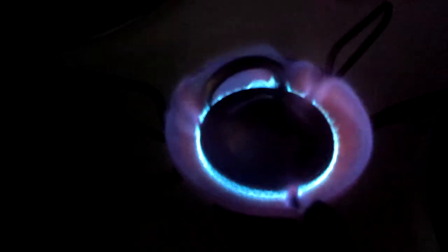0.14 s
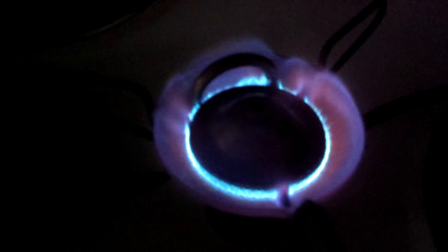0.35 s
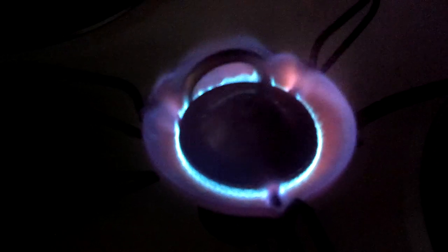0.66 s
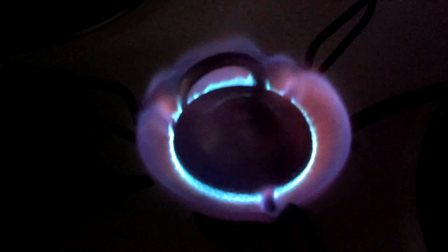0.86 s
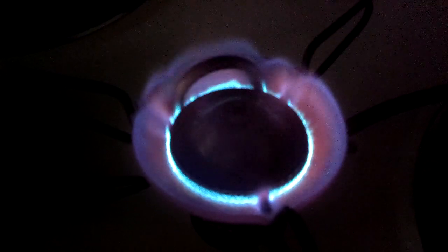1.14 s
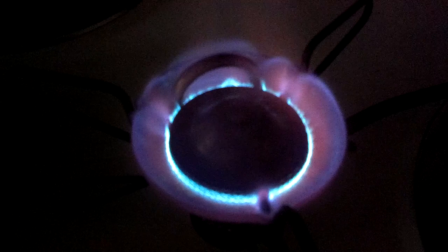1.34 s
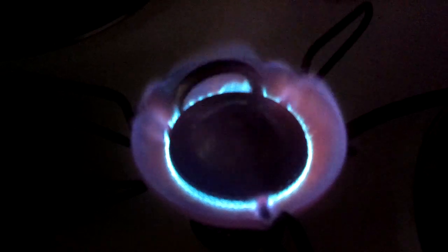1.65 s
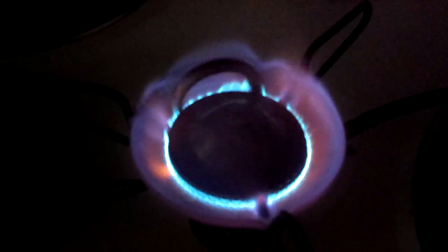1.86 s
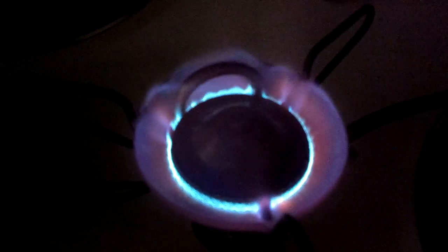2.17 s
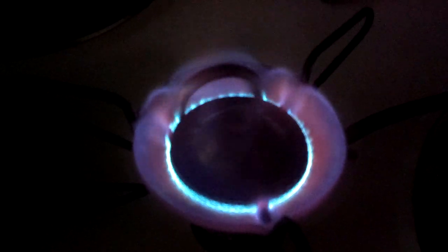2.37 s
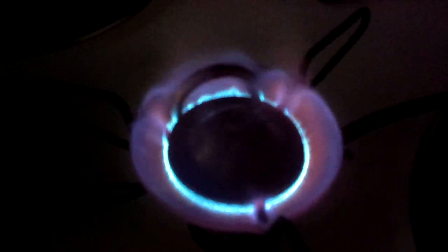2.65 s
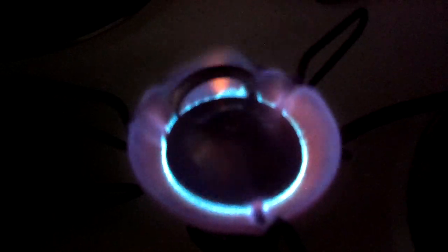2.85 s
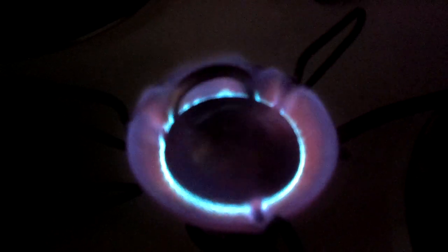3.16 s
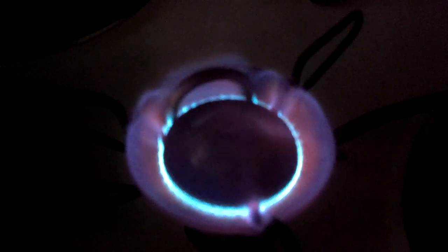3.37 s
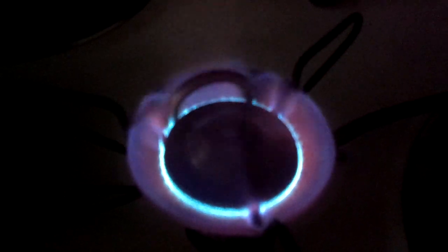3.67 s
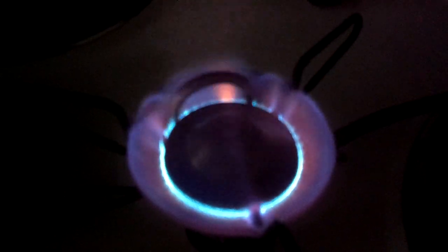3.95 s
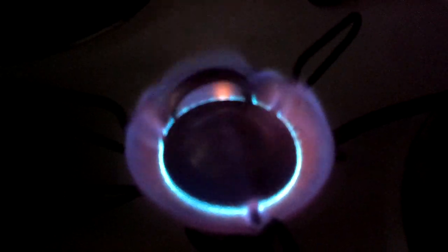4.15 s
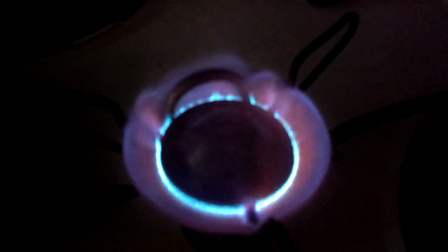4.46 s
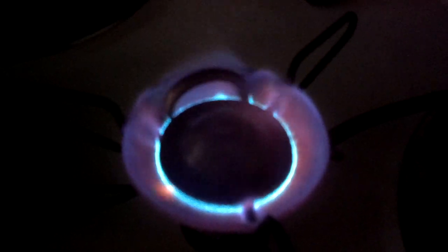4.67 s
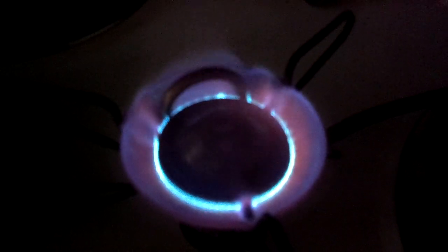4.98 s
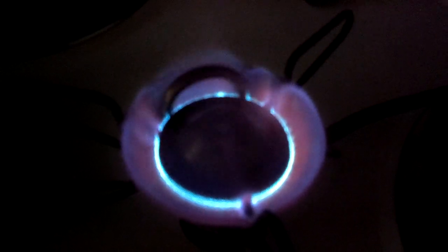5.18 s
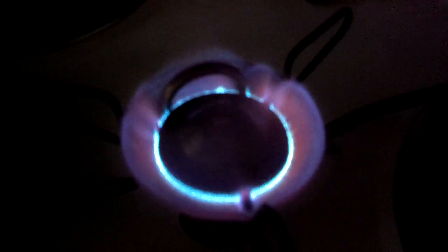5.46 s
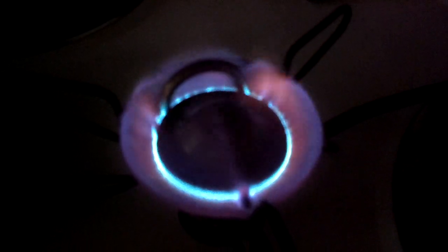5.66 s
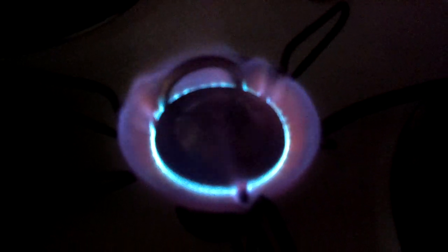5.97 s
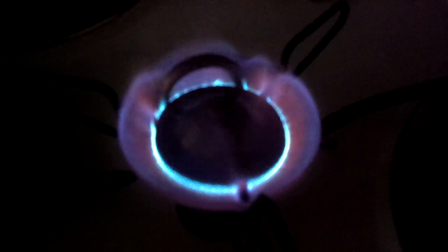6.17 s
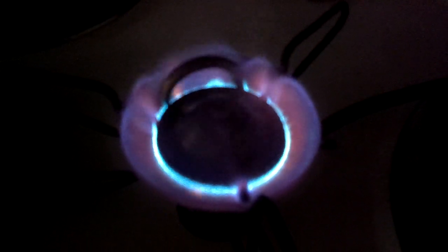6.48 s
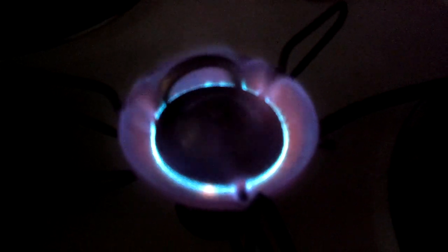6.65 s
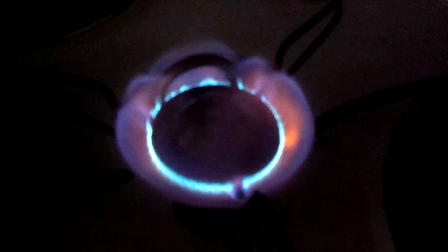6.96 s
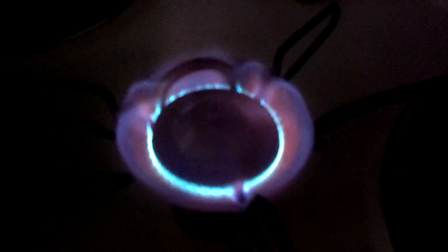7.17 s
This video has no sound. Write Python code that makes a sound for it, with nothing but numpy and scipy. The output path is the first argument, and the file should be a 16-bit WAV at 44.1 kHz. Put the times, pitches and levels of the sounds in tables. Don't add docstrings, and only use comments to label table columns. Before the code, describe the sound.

A small liquid-fuel burner runs steadily on a kitchen range. Bright, slightly ringing hiss of vapour dominates, swelling in brief irregular sputters a few times a second, over a quieter low flame roar. Near the end hot metal gives one short dull pop. Close stereo pickup with a hollow, phasey width and only faint room reflection.

```python
import sys
import numpy as np
from scipy import signal
from scipy.fft import rfft, irfft, next_fast_len
from scipy.io import wavfile
from scipy.ndimage import uniform_filter1d, map_coordinates

SR = 44100
rng = np.random.default_rng(int(sys.argv[2]) if len(sys.argv) > 2 else 0)


def transcribe(u):
    v = np.clip(np.atleast_2d(u).T, -1, 1)
    q = np.round(v * 32767).astype(np.int16)
    wavfile.write(sys.argv[1], SR, q)


def volts_from_decibels(level):
    exponent = np.asarray(level, float) / 20
    return 10 ** exponent


N = 322812


def unit(x):
    return x / np.sqrt(np.mean(x ** 2) + 1e-20)


def along(points, hz):
    f, *columns = np.transpose(points)
    return [np.interp(np.log(hz + 1), np.log(f + 1), column) for column in columns]


def wobble(rate):
    knots = rng.standard_normal(int(N * rate / SR) + 4)
    return map_coordinates(knots, [np.arange(N) * rate / SR])


def filtered(x, response):
    m = next_fast_len(N + 8192)
    return irfft(rfft(x, m) * response(np.fft.rfftfreq(m, 1 / SR)), m)[..., :N]


def turbulence(patchy_db):
    z = signal.stft(rng.standard_normal(N), nperseg=512)[2]
    field = uniform_filter1d(rng.standard_normal(z.shape), size=7, axis=0)
    field = uniform_filter1d(field, size=8, axis=1)
    return signal.istft(z * volts_from_decibels(patchy_db * unit(field)), nperseg=512)[1][:N]


# pitch in Hz, level in dB.
RUSH_COLOUR = [(300, -29), (900, -10), (1550, -12.5), (2000, -5.5), (2800, -9.5), (4000, -9), (5000, -4.5),
               (5350, -18), (5750, -0.5), (6800, -8), (7400, -18), (8500, -13.5), (12000, -30)]
# pitch in Hz, level in dB.
HISS_COLOUR = [(3000, -33), (6000, -1), (7500, -9), (8200, -7.5), (9200, -5.5), (10300, -2), (10800, -17),
               (11600, -5.5), (13000, -1.5), (14200, -5), (15000, -1), (16500, 0)]


def jet():
    pressure_db = vapour_pressure()
    sputter_db = boiling() + 1.1 * spits(rate=40, rise_s=0.0018, fall_s=0.0085) + 0.5 * wobble(55)
    rush = filtered(turbulence(patchy_db=0.74), lambda hz: volts_from_decibels(along(RUSH_COLOUR, hz)[0]) * cup(hz))
    hiss = filtered(turbulence(patchy_db=1.0), lambda hz: volts_from_decibels(along(HISS_COLOUR, hz)[0]) * cup(hz))
    rush_db = -44.5 + 0.63 * pressure_db + 0.46 * (sputter_db - sputter_db.mean())
    hiss_db = -45.5 + pressure_db + sputter_db
    direct = volts_from_decibels(rush_db) * unit(rush) + volts_from_decibels(hiss_db) * unit(hiss)
    return filtered(direct, surfaces)


# pitch in Hz, width in Hz, boost in dB.
CUP_RINGS = [(3394, 780, 11.5), (4530, 330, 5), (6210, 303, 8.5), (8610, 660, 9.5), (9490, 160, 4.5),
             (11430, 125, 13), (14900, 350, 5)]


def cup(hz):
    return volts_from_decibels(sum(db / (1 + (2 * (hz - centre) / width) ** 2) for centre, width, db in CUP_RINGS))


# delay in seconds, level in dB.
ECHOES = [(.00118, -31), (.00164, -30), (.00184, -59), (.00202, -40), (.0024, -46), (.00335, -29),
          (.00462, -47), (.00504, -14.5), (.00544, -23.5), (.0059, -14), (.00665, -21.5), (.0072, -30)]


def surfaces(hz):
    return 1 + sum(volts_from_decibels(db) * np.exp(-2j * np.pi * hz * delay) for delay, db in ECHOES)


# time in seconds, level in dB.
PRESSURE = [
    (0, 5.5),
    (.07, 0),
    (1.6, -0.04),
    (2.9, -0.46),
    (3.7, .5),
    (5.1, 0.5),
    (6.6, 0.2),
    (6.8, -1.1),
    (7.32, -0.5),
]


def vapour_pressure():
    s, db = np.transpose(PRESSURE)
    return np.interp(np.arange(N) / SR, s, db)


# start in seconds, swell in dB, length in seconds.
SURGES = [(0.283, 7, 0.046), (0.477, 4.5, 0.089), (0.603, 3.5, 0.1), (0.76, 5, 0.055), (0.85, 3.8, 0.11),
          (1.033, 4.5, 0.057), (1.11, 7, 0.051), (1.308, 4.5, 0.15), (1.449, 5.3, 0.093), (1.59, 3, 0.12),
          (1.858, 3.6, 0.076), (2.222, 5, 0.087), (2.602, 3.7, 0.11), (2.813, 5.5, 0.082),
          (3.324, 5.5, 0.064), (3.468, 3.9, 0.12), (3.632, 2.5, 0.14), (4.133, 3, 0.082), (4.24, 1.5, 0.11),
          (4.535, 3, 0.11), (4.767, 1, 0.1), (4.83, 2.5, 0.063), (5.305, 6, 0.033), (5.49, 3, 0.054),
          (5.805, 3.5, 0.064), (5.947, 7, 0.037), (6.044, 6, 0.045), (6.116, 1.5, 0.11),
          (6.273, 5.5, 0.048), (6.565, 3.5, 0.1)]


def boiling():
    s, db, length = np.transpose(SURGES)[:, :, None]
    coarse = np.arange(0, N, 32)
    phase = np.clip((coarse / SR - s) / length, 0, 1)
    lean = 0.92
    swell = (db * np.sin(np.pi * phase ** lean) ** 2).sum(axis=0)
    swell = np.interp(np.arange(N), coarse, swell)
    simmer = 1.15 * spits(rate=14, rise_s=0.008, fall_s=0.012)
    return swell + simmer * volts_from_decibels(-1.5 * swell)


def spits(rate, rise_s, fall_s):
    when, size = rng.random((int(rate * N / SR), 2)).T
    kicks = np.bincount((when * N).astype(int), 0.15 + size, N)
    t = np.arange(SR // 5) / SR
    bump = np.exp(-t / fall_s) - np.exp(-t / rise_s)
    bumps = signal.fftconvolve(kicks, bump)[:N]
    return unit(bumps - uniform_filter1d(bumps, size=SR // 8))


# pitch in Hz, level in dB.
ROAR_COLOUR = [(25, -48), (45, -28), (70, -21.5), (120, 0), (190, -3.5), (285, 1), (350, -8.5), (500, -9.5),
               (650, -21), (950, -20), (1500, -29), (2500, -57), (5000, -61)]
# pitch in Hz,
# left over right in dB, lag of the right in radians, likeness of the two from 0 to 1.
ROAR_STEREO = [(40, 5.5, .05, 0.9), (99, -0.5, 0.51, 0.9), (128, 3.5, 0.53, 0.98), (191, 3, 0.55, 0.93),
               (280, 1, 1.44, 0.81), (290.5, 12.5, 1.35, 0.7), (390, 5, 0.43, 0.6), (596, 6.5, 0.71, 0.81),
               (740, 3, 0.57, 0.83), (1080, 0.5, 0.65, 1)]


def roar():
    def ports(hz):
        tilt_db, lag, alike = along(ROAR_STEREO, hz)
        turn = np.arccos(np.clip(alike, 0, 1)) / 2
        gain = volts_from_decibels(along(ROAR_COLOUR, hz)[0] + np.array([tilt_db, -tilt_db]) / 2)
        gain = gain * np.exp(0.5j * np.array([lag, -lag]))
        return gain * np.cos(turn), gain * np.sin(turn) * [[1], [-1]]

    shared = filtered(turbulence(patchy_db=0.6), lambda hz: ports(hz)[0])
    own = filtered(turbulence(patchy_db=-0.7), lambda hz: ports(hz)[1])
    level_db = -43.5 + 1.1 * vapour_pressure() + 0.82 * wobble(9) + 0.51 * wobble(1.51)
    return volts_from_decibels(level_db) * unit(shared + own)


# time in seconds, peak level in dB.
POPS = [
    (6.99, -27),
]
# pitch in Hz, left level in dB, right level in dB,
# time to fade by 60 dB in seconds, left delay in seconds, right delay in seconds.
POP_TONES = [(1450, -3, -2, .011, .0012, .0005), (950, -6, -5, .016, .0013, .0004),
             (480, 0, -9, .016, .0021, .0011), (290, -12, 1, .04, .0035, .003),
             (170, -2, -3, .12, .0035, .0027)]


def pop():
    out, t = np.zeros((2, N)), np.arange(N) / SR
    for s, db in POPS:
        for hz, left_db, right_db, fade_s, left_lag, right_lag in POP_TONES:
            age = np.maximum(t - s - np.array([[left_lag], [right_lag]]), 0)
            level_db = db - 0.5 + np.array([[left_db], [right_db]]) - 60 * age / fade_s
            out += volts_from_decibels(level_db) * np.sin(2 * np.pi * hz * age)
    return out


def walls():
    noise = rng.standard_normal((2, N))
    return volts_from_decibels(-70) * unit(filtered(noise, lambda hz: volts_from_decibels(along(RUSH_COLOUR, hz)[0])))


def scene():
    return jet() + roar() + pop() + walls()


# pitch in Hz, left over right in dB.
SHADE = [(1700, 0), (2150, -1.5), (2500, -0.5), (3000, 3), (3500, 0), (3850, -2.5), (4200, -2), (5700, 3),
         (6200, 2), (6700, -1), (8300, -0.5), (8700, 0), (9200, 1), (10700, -1)]


def microphones(dry):
    def ports(hz):
        shade = volts_from_decibels(along(SHADE, hz)[0] / 2)
        late = np.exp(-2j * np.pi * hz * 16 / SR)
        return (hz < 15760) * np.array([shade, -late / shade])

    return filtered(dry, ports)


def band_limit(x):
    return signal.sosfilt(signal.butter(12, 17080, fs=SR, output="sos"), x)


def record(dry):
    mix = microphones(dry)
    return band_limit(mix)


dry = scene()
out = record(dry)
transcribe(out)
```